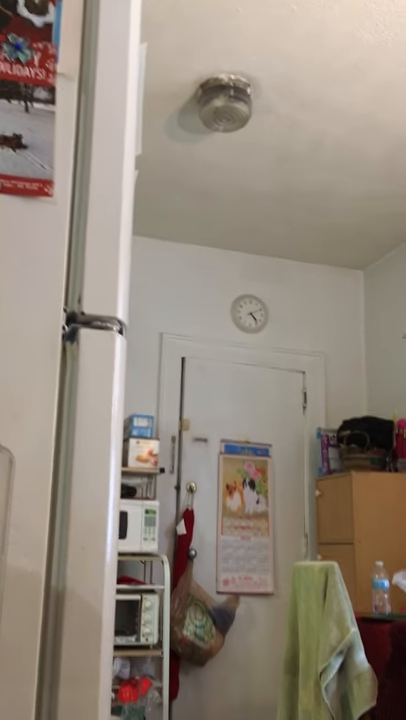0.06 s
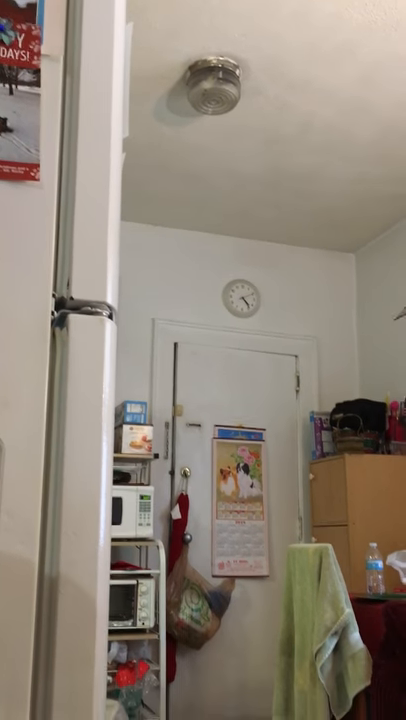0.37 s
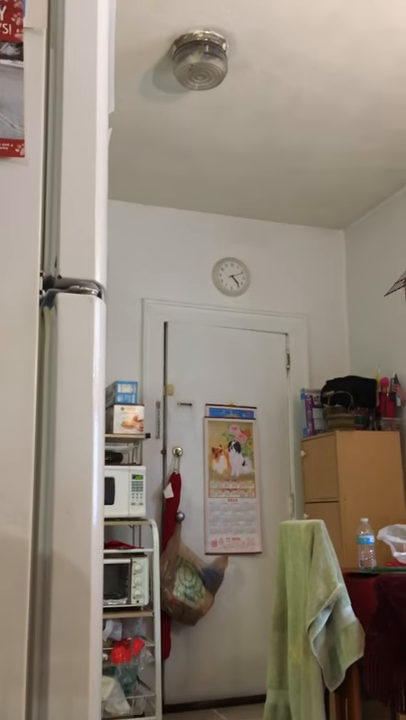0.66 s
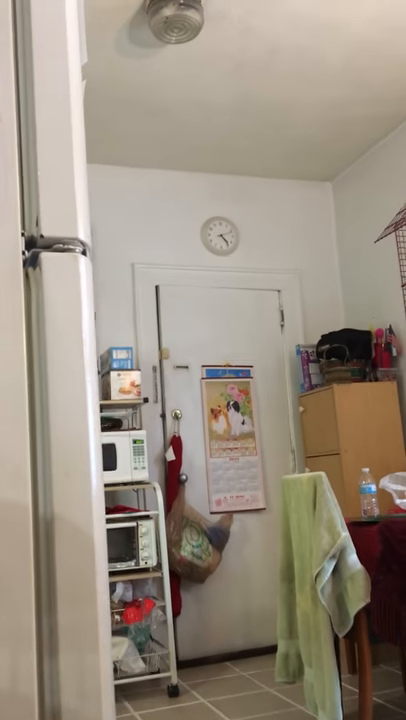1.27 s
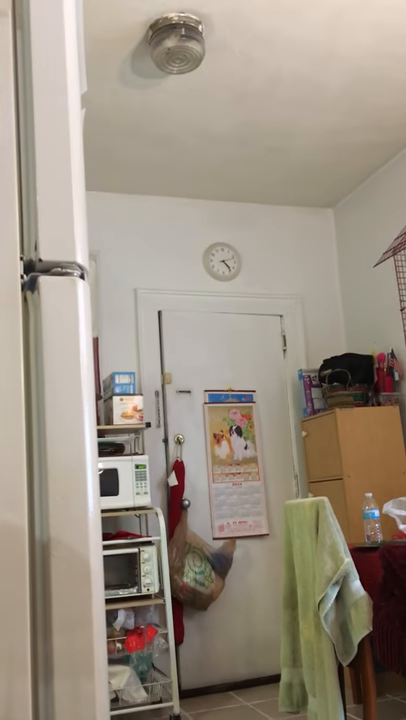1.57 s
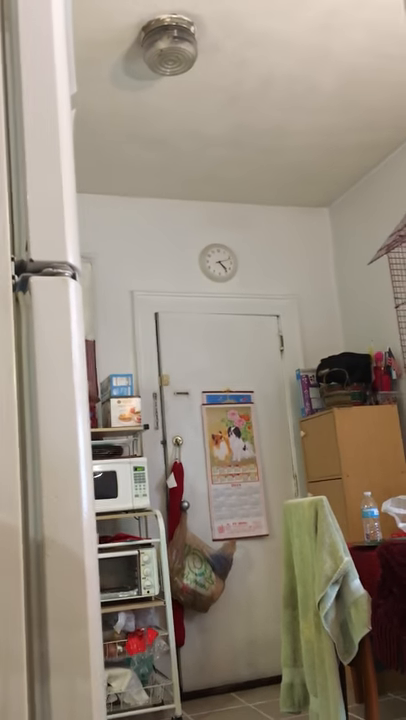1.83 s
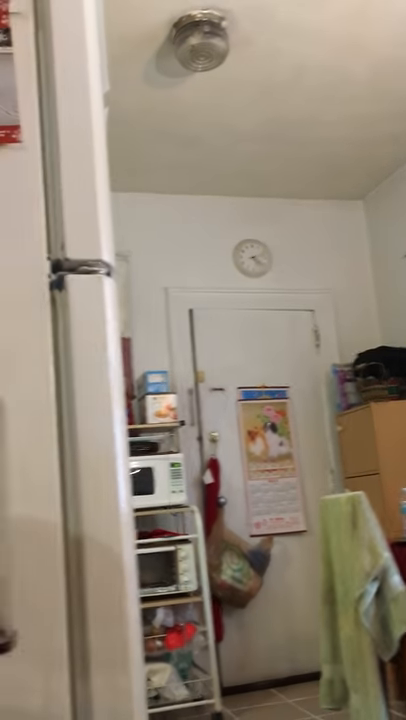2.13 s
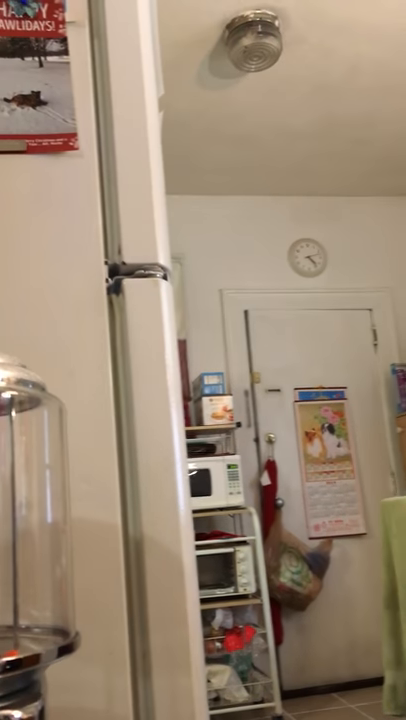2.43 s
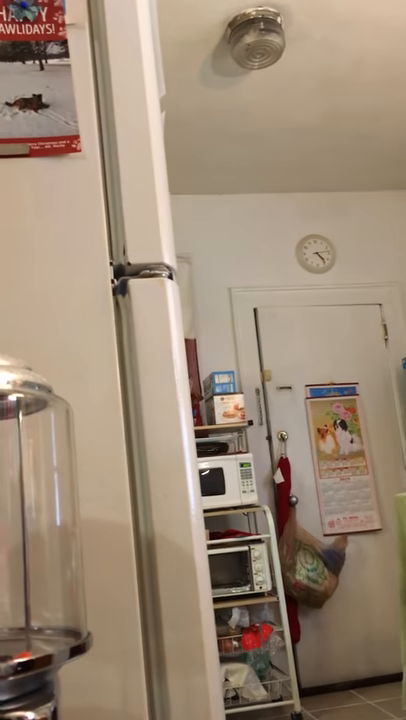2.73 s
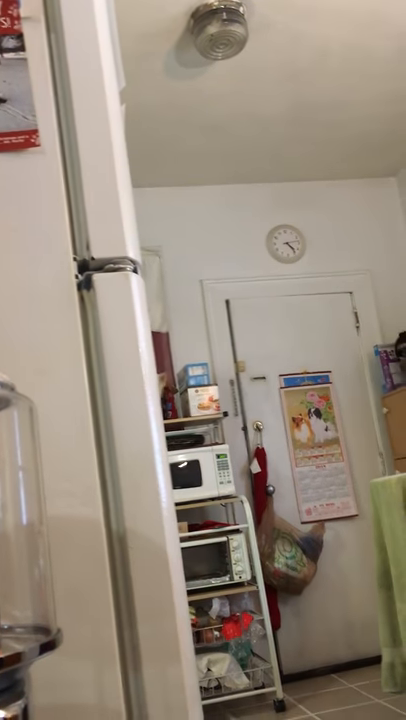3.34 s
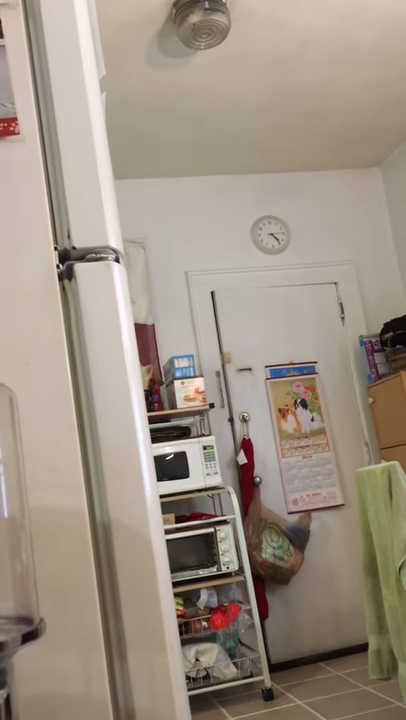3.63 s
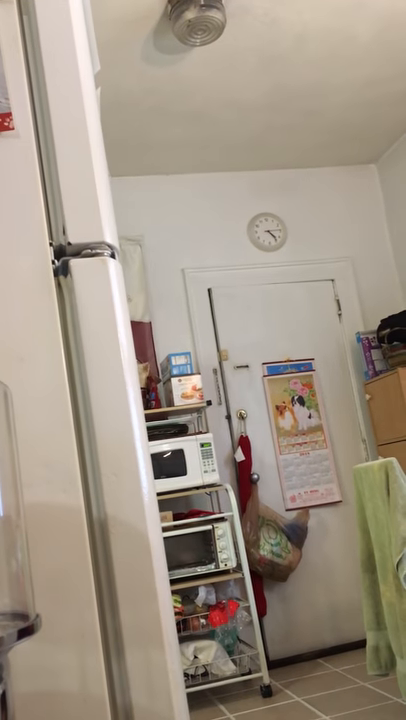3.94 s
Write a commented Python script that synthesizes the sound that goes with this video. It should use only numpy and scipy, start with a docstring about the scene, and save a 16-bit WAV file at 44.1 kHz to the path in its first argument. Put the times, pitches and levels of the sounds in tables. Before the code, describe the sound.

Coins jingle and a container knocks, then small metal pieces rattle and clink close by.

```python
"""Kitchen, close by: coins and small metal parts are handled in a hard container.
Coins jingle, the container knocks, parts are stirred; later one bright piece clinks and slides.
Each contact is a decaying noise burst; coins, parts and container add ringing modes.
Dull bumps, scuffs and tiny clicks come in between. The room hums; handling rumbles at the end."""
import sys
import numpy as np
from scipy import signal
from scipy.fft import rfft, irfft
from scipy.io import wavfile

SR = 44100
rng = np.random.default_rng(int(sys.argv[2]) if len(sys.argv) > 2 else 0)


def store_wav(level_fs):
    """Save 16-bit WAV to argv[1]."""
    pcm = np.round(np.clip(np.atleast_2d(level_fs), -1, 1) * 32767)
    wavfile.write(sys.argv[1], SR, pcm.T.astype(np.int16))


N = 176400

# background spectra: f/Hz, relative level/dB
ROOM_SPECTRUM = [(15, -43.5), (25, -20), (76, 4.5), (301, 1.5), (1190, -7), (16000, -49.5)]
HISS_SPECTRUM = [(200, -7), (2000, -2.5), (9500, -18), (13500, -17)]
RUMBLE_SPECTRUM = [(20, -17), (60, -3.5), (250, -25.5), (4000, -54)]
# background envelopes: t/s, level/dB
HISS_ENVELOPE = [(0, -64), (1.9, -65), (2.25, -73), (2.7, -62), (4, -63)]
RUMBLE_ENVELOPE = [(3.5, -84), (3.7, -50.5), (4, -38)]
# kitchen reverberation: f/Hz, t60/s
ROOM_DECAY = [(300, .5), (2500, .5), (6500, .38), (14000, .24)]

# dry clicks: t/s, level/dB
TICK_HITS = [(1.997, -36), (2.8172, -29), (3.169, -20), (3.194, -26), (3.274, -28), (3.2845, -22),
             (3.2955, -21), (3.4015, -27), (3.459, -32), (3.5545, -29), (3.776, -26), (3.882, -33),
             (3.9228, -22), (3.959, -28)]
# light pitched taps, and at 1.714 s the parts' 2140 Hz mode ringing out: t/s, level/dB, f/Hz, t60/s
TAP_HITS = [(1.229, -31, 2000, .04), (1.714, -24, 2140, .06), (2.168, -36, 800, .014),
            (2.283, -33, 370, .016), (2.4587, -39, 12300, .06)]
# scuffs (t at the crest) and bumps on the counter: t/s, level/dB, tilt/(dB/oct)
SCUFF_SWELLS = [(0.931, -37, 5), (.965, -37, -2), (1.031, -40, 2), (1.127, -36, 0.5), (1.312, -34, -7),
                (1.459, -35.5, 8), (1.511, -30.5, -1.5)]
BUMP_HITS = [(1.62, -24, 5.5), (2.489, -29.5, 2.5), (2.514, -27.5, 3), (2.955, -28.5, 3), (3.348, -33.5, 1),
             (3.396, -29.5, 6.5), (3.422, -28.5, 4.5), (3.5402, -22, 2.5), (3.612, -40, -1),
             (3.938, -29, 4)]
# tumbling parts, clinks of the bright piece: t/s, level/dB
PART_HITS = [(1.253, -23), (1.263, -21), (1.288, -25), (1.356, -22), (1.409, -27), (1.470, -23),
             (1.494, -24.5), (1.510, -20), (1.579, -30.5), (1.638, -24), (1.662, -23), (1.751, -24.5),
             (1.768, -24), (1.859, -30), (2.028, -34.5)]
PIECE_HITS = [(2.696, -33.5), (2.8738, -28.5), (2.879, -19.5), (2.895, -15.5), (2.9115, -24),
              (2.962, -17.5), (2.989, -24), (3.082, -30.5), (3.092, -30), (3.253, -38.5), (3.282, -33),
              (3.786, -37)]
# container knocks: t/s, level/dB, tilt/(dB/oct), low-pass f/Hz
KNOCK_HITS = [(0.1367, -8, -1, 14200), (0.395, -7.5, -1.2, 13900), (0.5287, -5.5, -0.2, 11200),
              (0.6467, -14.5, -3, 12300), (0.658, -9.5, -2.34, 10400), (3.0358, -6.5, 2.5, 4080)]
# coin on coin: t/s, level/dB, mode gain/dB
COIN_STRIKES = [(0.0234, -25.5, 10), (0.033, -18.5, 13.5), (0.1128, -19, -8.5), (0.1445, -18.5, 17),
                (0.158, -24, 5.5), (0.2004, -18.5, 9), (0.224, -14.5, -11.5), (0.364, -20.5, 14)]

# envelopes of the small contacts between hits: t/s, level/dB
TICK_ENVELOPE = [(3, -34), (4, -47)]
PART_ENVELOPE = [(.9, -51), (1.22, -55.5), (1.27, -36), (1.39, -55), (1.5, -33.5), (1.7, -38.5),
                 (1.95, -66)]
PIECE_ENVELOPE = [(2.88, -40), (3.06, -58), (3.11, -29), (3.16, -34), (3.2, -57)]
COIN_ENVELOPE = [(0, -18), (.06, -25), (.1, -31), (.2, -30.5), (.31, -25.5), (.36, -41)]

# clatter spectra: f/Hz, relative level/dB
TICK_SPECTRUM = [(300, -22), (4000, -19), (10000, 0), (16000, -2)]
BUMP_SPECTRUM = [(170, -12), (400, 7), (1500, -7), (3000, -21), (16000, -48.5)]
PART_SPECTRUM = [(200, -13), (1000, 0), (3500, 4), (7400, -2), (9000, 2), (13000, -2), (16000, -11)]
PIECE_SPECTRUM = [(150, -18), (450, -11), (2000, -5.5), (5400, 7), (7800, 1.5), (10500, 4.5), (16000, -0.5)]
KNOCK_SPECTRUM = [(160, -28.5), (360, 2.5), (900, 0), (3700, 1), (6800, 1), (12500, 0.5), (16000, -7)]
COIN_SPECTRUM = [(150, -27), (390, -2.5), (600, -12), (4800, -4), (7000, -2), (12500, 1), (16000, -8.5)]

# ringing modes: f/Hz, relative level/dB, t60/s
PART_RING = [(2150, -14, .06), (3090, -14, .06), (3290, -21, .05), (8490, -18, .05)]
PIECE_RING = [(5215, -12, .115), (5390, -15, .115), (5690, -16, .08), (7220, -23, .07)]
CONTAINER_RING = [(390, -25, .14), (1090, -21, .1), (1560, -18, .08), (1690, -20, .09), (3275, -25, .07)]
COIN_RING = [(5380, -28, .1), (6820, -23, .08), (9105, -15, .085), (9380, -20, .06), (11070, -23, .1),
             (13765, -22, .11)]

ROOM_DB, HUM_DB, HUM_HZ, HUM_WIDTH_HZ = -60.5, -61.5, 68, 19
# clatter decay in the bass; halved at DAMPING_HZ
TICK_T60_S, BUMP_T60_S, PART_T60_S = .01, .18, .21
PIECE_T60_S, KNOCK_T60_S, COIN_T60_S = .089, .12, .095
DAMPING_HZ, CUTOFF_HZ = 8300, 15900
STRAY_T60_S, MODE_SPREAD_DB, JOSTLE_SPREAD_DB = .06, 4, 3.5
SCUFF_DB_PER_S, GRAINS_PER_S, LOOSEN_DB_PER_S = 457, 980, 14


def amp(db):
    """dB to gain."""
    return 10 ** (np.asarray(db) / 20)


def unit_rms(x):
    """Scale to rms 1."""
    return x / np.sqrt(np.mean(x ** 2) + 1e-20)


def at_hz(table, hz):
    """Interpolate over log frequency."""
    table_hz, values = np.transpose(table)
    return np.interp(np.log(hz + 1), np.log(table_hz + 1), values)


def add(mix, start_s, sound):
    """Mix in at start_s."""
    span = mix[max(round(start_s * SR), 0):][:len(sound)]
    span += sound[:len(span)]


def band_decay(x, t60_s_at):
    """Seven bands, each decaying with its own t60."""
    t, hz = np.arange(len(x)) / SR, np.fft.rfftfreq(len(x), 1 / SR)
    centres_hz = np.geomspace(200, 16000, 7)
    bins, out = rfft(x), np.zeros(len(x))
    for centre_hz, weights in zip(centres_hz, np.eye(7)):
        band = irfft(bins * at_hz(list(zip(centres_hz, weights)), hz), len(x))
        out += band * amp(-60 * t / t60_s_at(centre_hz))
    return out


def colour(x, spectrum, tilt_db_oct, size=2048):
    """Minimum-phase filter: spectrum plus a tilt above 300 Hz."""
    hz = abs(np.fft.fftfreq(size, 1 / SR))
    gain_db = at_hz(spectrum, hz) + tilt_db_oct * np.log2(np.maximum(hz, 300) / 2000)
    log_response = np.conj(signal.hilbert(np.log(amp(gain_db))))
    impulse = np.fft.ifft(np.exp(log_response)).real
    return signal.fftconvolve(x, impulse[:size // 2])[:len(x)]


def noise(gain):
    """Steady noise, one gain per FFT bin, rms 1."""
    return unit_rms(irfft(rfft(rng.standard_normal(N)) * gain, N))


def contact(spectrum, t60_s, modes=(), tilt_db_oct=0, ring_db=0, strays=12, size=12000):
    """One blow: clatter peaking near 1; ringing bodies add stray pitches and detuned modes."""
    t = np.arange(size) / SR
    x = band_decay(rng.choice([-1., 1.], size), lambda hz: t60_s / (1 + hz / DAMPING_HZ))
    if modes:
        stray_gain = 2 * amp(-17 - 60 * t / STRAY_T60_S)
        for hz in rng.uniform(1200, 15000, strays):
            x += stray_gain * np.sin(2 * np.pi * (hz * t + rng.random()))
    x = colour(x, spectrum, tilt_db_oct)
    onset_samples = int(SR * min(t60_s, .1) / 10) + 40
    x /= 2.5 * np.std(x[:onset_samples])
    for hz, db, ring_t60_s in modes:
        mode_db = db + ring_db + MODE_SPREAD_DB * rng.uniform(-1, 1)
        detuned_hz = hz * (1 + .009 * rng.uniform(-1.7, 1))  # no two pieces are alike
        x += amp(mode_db - 60 * t / ring_t60_s) * np.sin(2 * np.pi * (detuned_hz * t + rng.random()))
    return x


def jostle(envelope, spectrum, t60_s, modes=(), rate_per_s=110):
    """Small random contacts following a level envelope."""
    times_s, levels_db = np.transpose(envelope)
    slots_s = np.arange(times_s[0], times_s[-1], 1 / rate_per_s)
    variants = [contact(spectrum, t60_s, modes) for _ in range(8)]
    out = np.zeros(N)
    for slot_s, (lag, pick, chance) in zip(slots_s, rng.random((N // 400, 3))):
        scatter_db = JOSTLE_SPREAD_DB * (-np.log(max(chance, .08)) - 1)
        db = np.interp(slot_s, times_s, levels_db) + scatter_db
        add(out, slot_s + 2 * lag / rate_per_s, amp(db) * variants[int(pick * len(variants))])
    return out


def kitchen(x, wet_db, size=30000):
    """Direct sound plus the reflections of a small hard room."""
    t = np.arange(size) / SR
    fade_in = np.clip((t - .003) / .008, 0, 1)
    reflections = rng.standard_normal(size) * (rng.random(size) < .15) * fade_in
    tail = band_decay(reflections, lambda hz: at_hz(ROOM_DECAY, hz))
    return x + amp(wet_db) * signal.fftconvolve(x, tail / np.linalg.norm(tail))[:N]


def background():
    """Wavering narrow-band hum, faint hiss, handling rumble, room noise."""
    t, hz = np.arange(N) / SR, np.fft.rfftfreq(N, 1 / SR)
    hum = amp(HUM_DB) * noise(np.exp(-((hz - HUM_HZ) / HUM_WIDTH_HZ) ** 2))
    hiss = amp(np.interp(t, *np.transpose(HISS_ENVELOPE))) * noise(amp(at_hz(HISS_SPECTRUM, hz)))
    rumble = amp(np.interp(t, *np.transpose(RUMBLE_ENVELOPE))) * noise(amp(at_hz(RUMBLE_SPECTRUM, hz)))
    room = amp(ROOM_DB) * noise(amp(at_hz(ROOM_SPECTRUM, hz)))
    return room + hum + hiss + rumble


def ticks():
    """Tiny dry clicks, light single-mode taps, and one ringing accent of the stirred parts."""
    out = jostle(TICK_ENVELOPE, TICK_SPECTRUM, TICK_T60_S, rate_per_s=24)
    for start_s, db in TICK_HITS:
        add(out, start_s, amp(db) * contact(TICK_SPECTRUM, TICK_T60_S))
    for start_s, db, hz, t60_s in TAP_HITS:
        spectrum = [(hz / 10, -20), (hz, 0), (hz * 2, -10), (hz * 10, -24)]
        add(out, start_s, amp(db) * contact(spectrum, t60_s / 2, [(hz, -6, t60_s)], strays=0))
    return kitchen(out, wet_db=-17.5)


def counter():
    """Things pushed along the counter scuff grittily; set down, they bump."""
    out, t = np.zeros(N), np.arange(N) / SR
    for crest_s, db, tilt_db_oct in SCUFF_SWELLS:
        grains = rng.standard_normal(N) * (rng.random(N) < GRAINS_PER_S / SR)
        swell = amp(db - SCUFF_DB_PER_S * abs(t - crest_s))
        out += swell * unit_rms(colour(grains, BUMP_SPECTRUM, tilt_db_oct))
    for start_s, db, tilt_db_oct in BUMP_HITS:
        add(out, start_s, amp(db) * contact(BUMP_SPECTRUM, BUMP_T60_S, tilt_db_oct=tilt_db_oct))
    return kitchen(out, wet_db=-10.5)


def stirred_parts():
    """Parts tumble and scrape, ringing more freely as the heap loosens."""
    out = jostle(PART_ENVELOPE, PART_SPECTRUM, PART_T60_S, PART_RING)
    for start_s, db in PART_HITS:
        ring_db = LOOSEN_DB_PER_S * (start_s - PART_HITS[0][0])
        add(out, start_s, amp(db) * contact(PART_SPECTRUM, PART_T60_S, PART_RING, ring_db=ring_db))
    return kitchen(out, wet_db=-12)


def bright_piece():
    """One metal piece clinks, bounces and slides."""
    out = jostle(PIECE_ENVELOPE, PIECE_SPECTRUM, PIECE_T60_S, PIECE_RING)
    for start_s, db in PIECE_HITS:
        add(out, start_s, amp(db) * contact(PIECE_SPECTRUM, PIECE_T60_S, PIECE_RING))
    return kitchen(out, wet_db=-11.5)


def container():
    """Knocks on the container, each with its own treble edge; bass-heavier knocks ring its body more."""
    out = np.zeros(N)
    for start_s, db, tilt_db_oct, edge_hz in KNOCK_HITS:
        ring_db = -2 * tilt_db_oct
        knock = contact(KNOCK_SPECTRUM, KNOCK_T60_S, CONTAINER_RING, tilt_db_oct, ring_db, strays=3)
        lowpass = signal.butter(4, edge_hz, fs=SR)
        add(out, start_s, amp(db) * signal.lfilter(*lowpass, knock))
    return kitchen(out, wet_db=-12.5)


def coins():
    """Coins strike each other and ring in high modes."""
    out = jostle(COIN_ENVELOPE, COIN_SPECTRUM, COIN_T60_S, COIN_RING)
    for start_s, db, ring_db in COIN_STRIKES:
        add(out, start_s, amp(db) * contact(COIN_SPECTRUM, COIN_T60_S, COIN_RING, ring_db=ring_db))
    return kitchen(out, wet_db=-1.5)


def scene():
    """Mono sum of all sources."""
    return (background() + coins() + container() + stirred_parts() + bright_piece()
            + counter() + ticks())[None]


def record(dry):
    """Low-pass at CUTOFF_HZ."""
    lowpass = signal.firwin(255, CUTOFF_HZ, window=("kaiser", 8), fs=SR)
    return signal.oaconvolve(dry, lowpass[None], "same")


dry = scene()
out = record(dry)
store_wav(out)
```